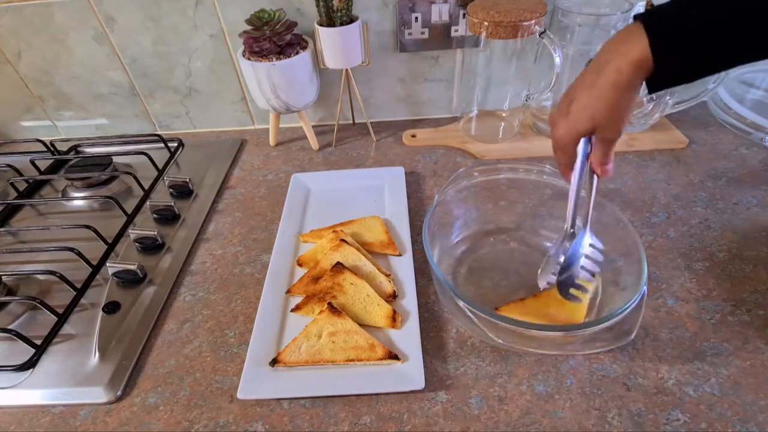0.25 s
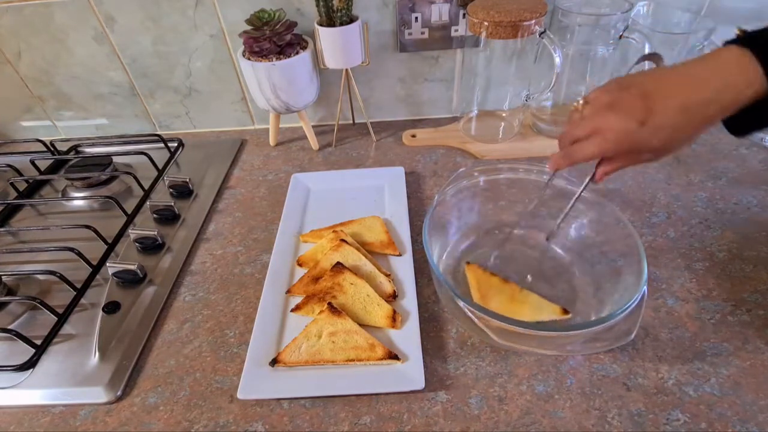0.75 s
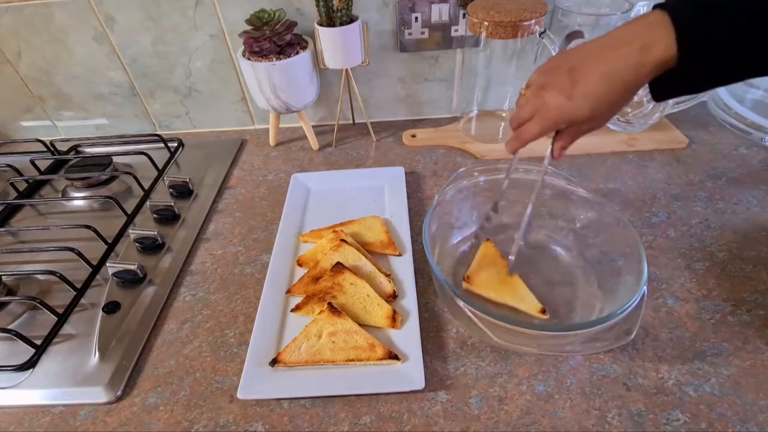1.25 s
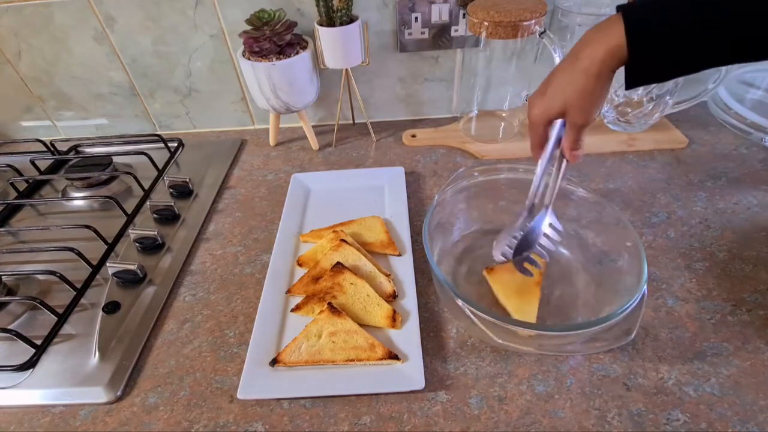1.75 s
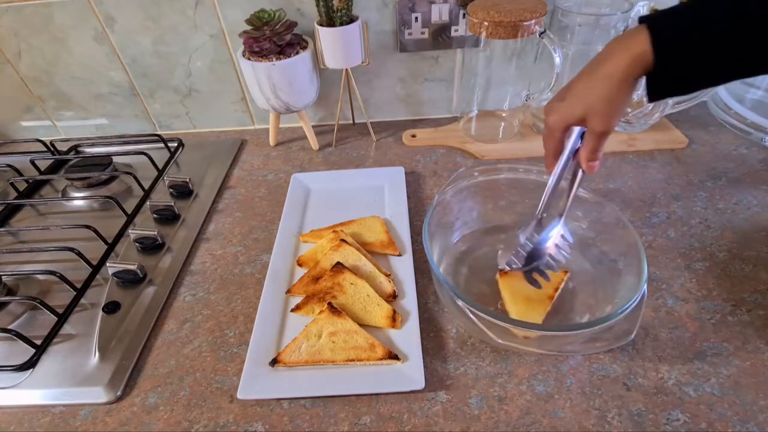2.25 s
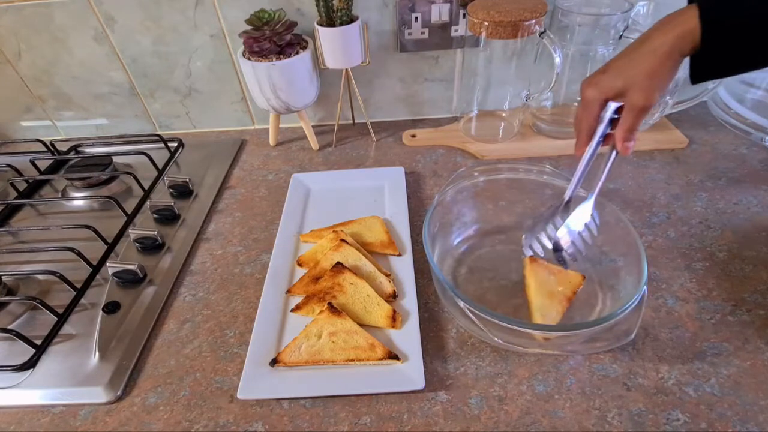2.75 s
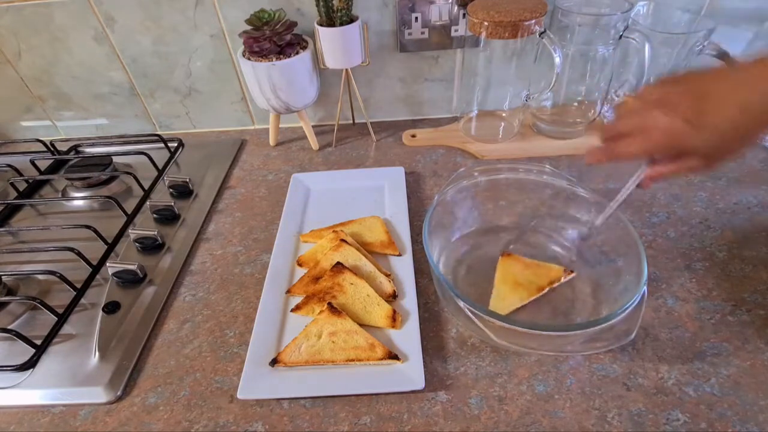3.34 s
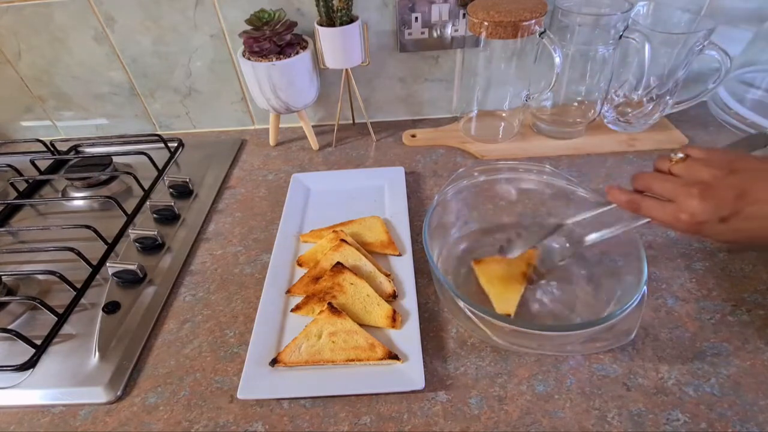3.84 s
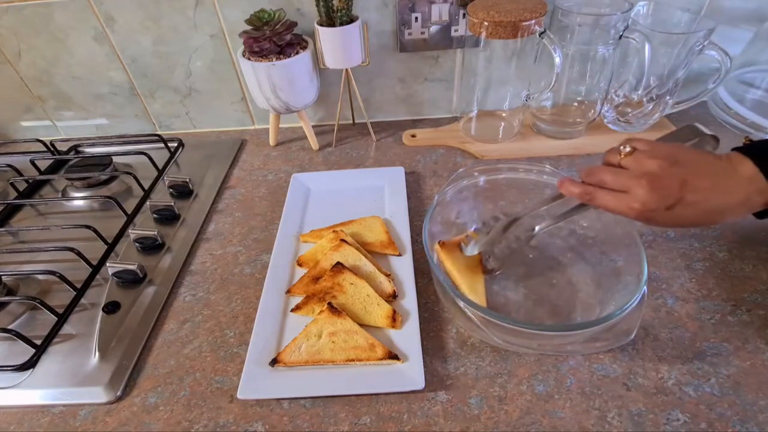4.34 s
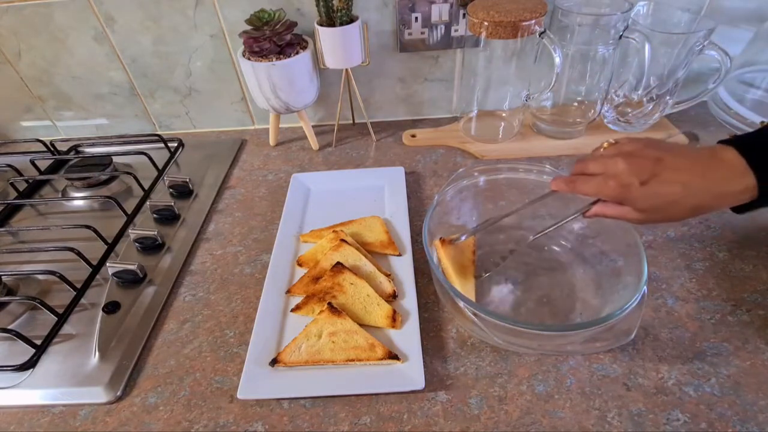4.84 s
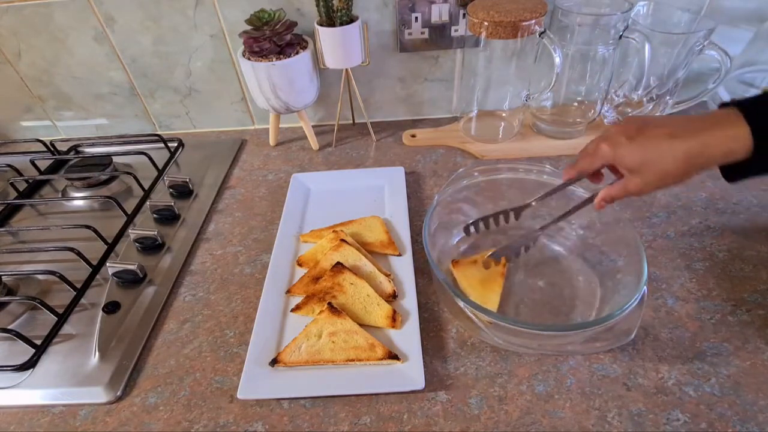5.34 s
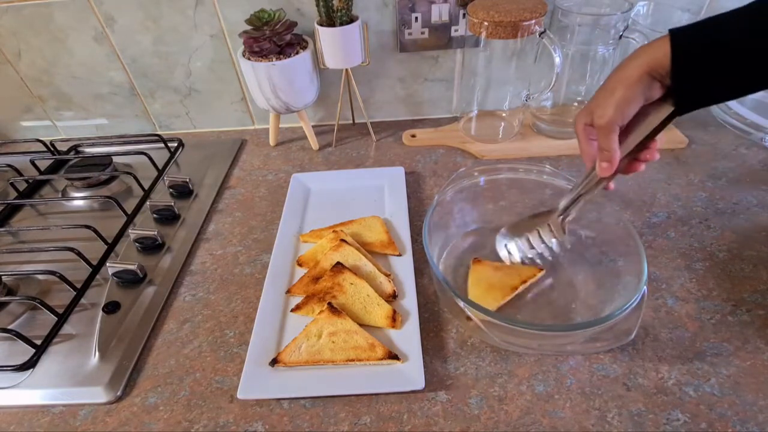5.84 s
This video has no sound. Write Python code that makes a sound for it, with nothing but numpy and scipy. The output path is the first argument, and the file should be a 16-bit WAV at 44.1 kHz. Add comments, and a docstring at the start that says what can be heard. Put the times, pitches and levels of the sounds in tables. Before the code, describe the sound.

A small tiled kitchen, heard close in stereo with the action slightly right; low rumble, thin hiss and a very faint steady high tone lie beneath. From 0 to 0.3 s, steel tong tips tap quickly and scrape in a glass bowl, with two tiny squeaks. Dull dry knocks of pastry crust follow at 0.4-0.6 s and around 1.1 s. From 1.5 to 2.5 s comes a busier run of light ticks, crusty crunches, short scrapes and soft base bumps. Barely audible ticks lead to a crisp crunch at 3.1 s. At 3.69 s a hard, bright crack on the glass is by far the loudest event, its ring fading with short room echoes. A crunchy knock comes at 3.9 s, then faint ticks and dull knocks around 4.5 s. A soft glass ping sounds at 5.14 s, the tong arms clack sharply at 5.62 s, and a light tap and small scrape finish near 5.8-6 s.

```python
"""Steel tongs and a toasted pastry in a glass bowl

A little to the right, tong tips tap and scrape in a bowl on a worktop: noise bursts and decaying modes.
They strike the glass once hard and also softly, squeak twice, and their arms clack together.
The pastry's crust knocks and crunches in short noise bursts. A small tiled kitchen answers with noise
echoes, over a low rumble, thin hiss and a faint high tone.
"""
import sys
import numpy as np
from scipy import signal
from scipy.fft import rfft, irfft
from scipy.io import wavfile
from scipy.ndimage import uniform_filter1d

SR = 44100
rng = np.random.default_rng(int(sys.argv[2]) if len(sys.argv) > 2 else 0)


def wav_record(signal):
    """Record a signal, one row per channel, as 16-bit PCM in the file named by sys.argv[1]."""
    frames = np.transpose(np.atleast_2d(signal))
    bounded = np.clip(frames, -1, 1)
    # unit amplitude maps onto the largest positive 16-bit level
    quanta = np.round(bounded * 32767).astype(np.int16)
    wavfile.write(sys.argv[1], SR, quanta)


N = 268128  # length of the scene [samples]
TIME = np.arange(N) / SR
AGE = TIME[:SR]  # time since a contact [s], up to one second
LEFT_RIGHT = np.array([[1], [-1]])  # opposite signs for the two channels

# Levels in the tables are relative: the functions add their own settings to them.
# A t60 is the time a sound takes to fall by 60 dB.


def amp(db):
    """Turn decibels into gain."""
    return 10 ** (np.asarray(db) / 20)


def unit(x):
    """Scale a signal to an rms of 1."""
    return x / np.sqrt(np.mean(x ** 2))


def fade(t60):
    """Die away exponentially after a contact, by 60 dB in t60 seconds."""
    return np.exp(-np.log(1000) * AGE / t60)


def on_bins(points, size):
    """Read a table of (frequency [Hz], value) at every FFT bin, along a logarithmic pitch scale."""
    hz, value = np.transpose(points)
    bin_hz = np.arange(size // 2 + 1) * SR / size
    return np.interp(np.log(bin_hz + 1), np.log(hz), value)


def noise(colour, likeness, size):
    """Make coloured stereo noise of rms 1; mixing mid and side sets how alike left and right are."""
    mid, side = rfft(rng.standard_normal((2, size)))
    likeness = np.clip(likeness, -1, 1)
    pair = mid * np.sqrt(1 + likeness) + LEFT_RIGHT * side * np.sqrt(1 - likeness)
    return unit(irfft(pair * amp(on_bins(colour, size)), size))


# How alike left and right hear a contact: (frequency [Hz], correlation [-1 to 1])
CONTACT_LIKENESS = [(150, 0.97), (600, 0.56), (1300, 0.077), (4000, 0.34), (12000, 0.59)]


def burst(colour, t60, rise_s=0.0013, patchy_db=6, spacing_hz=75):
    """Use fading noise for a crowd of short-lived modes; in the treble some stand out from the rest."""
    hz = np.arange(SR // 2 + 1)
    heights = rng.standard_normal(600).clip(-1.7, 1.7)
    ripple = np.interp(hz / spacing_hz, np.arange(600), heights)
    lift = amp(patchy_db * ripple * np.clip(hz / 5000, 0, 1) ** 2)
    lift = lift / np.sqrt(uniform_filter1d(lift ** 2, size=1500))  # keep the overall colour
    plain = noise(colour, on_bins(CONTACT_LIKENESS, SR), size=SR)
    crowd = irfft(rfft(plain) * lift, SR)
    return crowd * fade(t60) * np.clip(AGE / rise_s, 0, 1)


def ring(modes, detune=0, scatter_db=0, centre_hz=3000, octaves=99):
    """Add decaying sines, strongest near the pitch the contact excites; each side gets its own phase."""
    out = np.zeros((2, SR))
    for hz, db, t60 in modes:
        pitch, luck = rng.standard_normal(2)
        phase = .75 * np.sin(hz / 270) * min(hz / 400, 1) * LEFT_RIGHT
        angle = 2 * np.pi * hz * (1 + detune * pitch) * AGE + phase
        wave = np.sin(angle.astype(np.float32))
        reach = np.exp(-.5 * (np.log2(hz / centre_hz) / octaves) ** 2)
        out += amp(db + scatter_db * luck) * reach * fade(t60) * wave
    contact = np.clip(AGE / 0.0011, 0, 1)  # the push lasts about a millisecond
    total_power = sum(amp(db) ** 2 for _, db, _ in modes) / 2
    return contact * out / np.sqrt(total_power)


def add(track, s, sound):
    """Mix a sound into a track, starting at s seconds."""
    start = max(int(s * SR), 0)
    track[:, start:start + sound.shape[1]] += sound[:, :N - start]


def through(x, response):
    """Pass a sound through a stereo response scaled to unit energy."""
    return signal.fftconvolve(np.atleast_2d(x), unit(response) / np.sqrt(SR), axes=1)[:, :N]


# Modes of the bowl's base on the worktop: (frequency [Hz], level [dB], t60 [s])
BASE_MODES = [(74, -26, 0.32), (120, -15.5, 0.86), (240, -9.5, 0.14), (306, -5, 0.25), (344.7, 4, 0.09),
              (413.8, -7.5, 0.24), (486, -5, 0.22), (633, -13.5, 0.2), (700, -12.5, 0.095)]


def thud():
    """The bowl's base bumps the worktop and rings in a few low modes."""
    return ring(BASE_MODES, detune=.02)


# Light taps of the tong tips:
# (time [s], pitch of the tips [Hz], steel level [dB], base thud level [dB], tick level [dB])
TAPS = [(0.0173, 1727, -29, -31.5, -25.5), (0.0795, 1690, -40, -50, -37.5), (0.1385, 1830, -31.5, -43, -32),
        (0.195, 1790, -39, -69, -38.5), (0.2612, 1830, -38, -46.5, -33.5), (1.072, 1750, -55, -59, -41.5),
        (1.1295, 1750, -72, -54, -45), (1.58, 1830, -43, -48, -38), (1.68, 1710, -45, -40.5, -37),
        (1.7229, 1670, -38.5, -36, -41), (1.78, 1810, -39, -45, -33), (1.8235, 1820, -34, -52, -54),
        (1.8919, 2180, -36.5, -50, -38.5), (1.9814, 1960, -43.5, -50, -50), (2.149, 1900, -71, -72, -44.5),
        (2.297, 1770, -39.5, -49, -36), (2.3139, 1800, -43, -48, -38.5), (2.4208, 1900, -37.5, -47, -43.5),
        (4.0114, 1850, -54.5, -51.5, -36.5), (5.4365, 1850, -72, -68, -48.5),
        (5.7576, 1850, -41.5, -58, -35)]
# Other modes of the steel tongs, damped by the hand: (frequency [Hz], level [dB], t60 [s])
TONG_MODES = [(1766, 1, 0.11), (1847, 3.5, 0.14), (2096, -10.5, 0.12), (2898, -0.5, 0.075), (3140, 5, 0.11),
              (3183, -5, 0.037), (3950, -2, 0.061), (4420, -5, 0.1), (5790, -12.5, 0.36),
              (6550, -14, 0.081), (7100, -29, 0.13), (8000, 3, 0.12), (8400, -8.5, 0.31), (9420, -19, 0.09),
              (11000, -22, 0.07)]
# Colour of a bright tick: (frequency [Hz], level per Hz [dB])
TICK_COLOUR = [(40, -21), (700, -2), (1400, -2), (1850, -10), (2500, -8.5), (3100, 0.5), (3600, -10),
               (6000, -5), (8300, 0), (9200, -3.5), (11000, -1.5), (15500, -15.5)]


def taps(tip_db=-9, ring_db=-11, thud_db=-4, tick_db=-3):
    """Each tap ticks, rings the tongs and bumps the bowl; the grip shifts the pitches and their shares."""
    out = np.zeros((2, N))
    for s, tip_hz, steel, base, tick in TAPS:
        # the tips chatter as they land, which roughens their resonance into a narrow band of noise
        chatter = [(tip_hz * .7, -45), (tip_hz * .88, -14), (tip_hz, 0),
                   (tip_hz * 1.14, -14), (tip_hz * 1.4, -45)]
        add(out, s, amp(steel + tip_db) * burst(chatter, t60=0.096, rise_s=0.0023))
        add(out, s, amp(steel + ring_db) * ring(TONG_MODES, detune=0.0142, scatter_db=3.0))
        add(out, s, amp(base + thud_db) * thud())
        add(out, s, amp(tick + tick_db) * burst(TICK_COLOUR, t60=0.049, rise_s=0.0042, patchy_db=3.0))
    return out


# Blows on the bowl's wall: (time [s], ring level [dB], crack level [dB],
# pitch the contact excites most [Hz], its reach [octaves], extra damping by the resting tongs, t60 [s])
CLINKS = [(2.99, -48.5, -57, 2630, .06, 0.84), (3.6863, -19, -7.5, 3440, 3.5, 8.8),
          (3.6916, -24.5, -19, 3900, .12, 0.78), (3.704, -37.5, -13.5, 7010, 0.69, 1),
          (5.138, -34.5, -58.5, 2000, 0.34, 1.6)]
# Modes of the glass bowl, where close pairs beat: (frequency [Hz], level [dB], t60 [s])
BOWL_MODES = [(1321, -4.5, 1), (1334, 2, 0.43), (1630, -12, .55), (1655, -1, 0.87), (1790, -19.5, 0.83),
              (1720, -11.5, 0.45), (1885, -4.5, .25), (2600, -15.5, 0.59), (2625, -5, 0.6),
              (2785, -13.5, 0.34), (2850, -11, 0.32), (3020, -11, 0.25), (3270, -13.5, 0.4),
              (3850, -8, 0.77), (3970, -10, 0.69), (3960, -3, .48), (3940, 10, 0.17), (5180, -9, 0.22),
              (5280, -5, 0.503), (5570, -15, 0.51), (6405, -8, 0.38), (6600, -8.5, 0.42), (6950, -10, .3),
              (6950, -5, 0.4), (7530, -12, 0.37), (8120, -8, 0.49), (7900, -14.5, .33), (8200, -9, 0.24),
              (9798, -14.5, .27), (11090, -8.5, 0.56)]
# Colour of the crack: (frequency [Hz], level per Hz [dB])
CRACK_COLOUR = [(25, -39), (70, -12), (130, -30.5), (230, -29.5), (370, -6), (660, -9.5), (960, -24.5),
                (1700, -1.5), (2200, -16.5), (2900, 1), (3400, -10.5), (3930, -1.5), (4350, -14.5),
                (5400, -6.5), (10000, -14), (15500, -26)]


def clinks():
    """Steel hits the glass wall: return the hard crack and the longer ring of the bowl separately."""
    cracks, rings = np.zeros((2, 2, N))
    for s, ring_db, crack_db, centre_hz, octaves, held_t60 in CLINKS:
        glass = ring(BOWL_MODES, centre_hz=centre_hz, octaves=octaves) * fade(held_t60)
        add(rings, s, amp(ring_db) * glass)
        add(cracks, s, amp(crack_db) * burst(CRACK_COLOUR, t60=0.045, rise_s=0.002, patchy_db=7.5))
    return cracks, rings


# The arms of the tongs clack together: (time [s], level [dB])
CLACKS = [(5.6234, -24), (5.6278, -24)]
# Colour of the clack: (frequency [Hz], level per Hz [dB])
CLACK_COLOUR = [(30, -30), (100, -8), (200, -8), (320, 1), (730, -0.5), (900, -10), (1300, -2.5),
                (2300, -9.5), (3000, -0.5), (4200, -12.5), (5100, -3), (6250, -8.5), (7300, 1.5),
                (9600, -5), (15000, -17.5)]


def clacks(steel_db=-11, glass_db=-21, thud_db=-12):
    """The two arms meet in a bright clatter that also jolts the bowl."""
    out = np.zeros((2, N))
    for s, db in CLACKS:
        clatter = burst(CLACK_COLOUR, t60=0.11, patchy_db=5.5)
        steel = amp(steel_db) * ring(TONG_MODES, detune=0.0022, centre_hz=7200, octaves=0.23)
        glass = amp(glass_db) * ring(BOWL_MODES, centre_hz=1640, octaves=0.15)
        add(out, s, amp(db) * (clatter + steel + glass + amp(thud_db) * thud()))
    return out


# The pastry's crust knocks on the glass, and at 3.906 s a like burst plays as the bowl's ring swells where its
# close modes beat: (time [s], knock level [dB], crunch level [dB])
KNOCKS = [(0.378, -43, -60), (0.502, -41, -72), (0.527, -42.5, -55), (0.5935, -36, -43.5),
          (0.608, -59, -42.5), (1.076, -40, -43), (1.129, -39, -68), (1.529, -43, -55), (1.563, -36, -43.5),
          (1.681, -36.5, -51), (1.711, -34, -37), (3.105, -64, -40.5), (3.1172, -37.5, -34),
          (3.906, -34, -37), (4.5248, -38.5, -69), (4.58, -41, -58), (4.606, -39, -58), (5.011, -50.5, -56),
          (5.435, -43.5, -70)]
# Colour of the dull knock: (frequency [Hz], level per Hz [dB])
KNOCK_COLOUR = [(60, -20.5), (300, -12.5), (660, 2.5), (950, -12.5), (1330, 3.5), (1650, -11), (2300, -12),
                (4000, -30), (12000, -22.5)]
# Colour of the crunch: (frequency [Hz], level per Hz [dB])
CRUNCH_COLOUR = [(1500, -18), (2800, 1), (4300, -1.5), (6000, -2.5), (10500, -4.5), (15500, -15)]


def pastry(knock_db=-3.5, thud_db=-18, crunch_db=-3.5):
    """Dry crust gives way: a dull knock, which bumps the bowl in proportion, and a short crunch; the burst at
    3.906 s instead stands for the bowl's ring swelling."""
    out = np.zeros((2, N))
    for s, knock, crunch in KNOCKS:
        add(out, s, amp(knock + knock_db) * burst(KNOCK_COLOUR, t60=0.048, rise_s=0.003))
        add(out, s, amp(knock + thud_db) * thud())
        add(out, s, amp(crunch + crunch_db) * burst(CRUNCH_COLOUR, t60=0.072, rise_s=0.0042, patchy_db=2.5))
    return out


def stroke(start, length):
    """Pressure of one stroke: the tips bite, ease off as they slide, then lift."""
    bite_share, ease_db, release_s = 0.19, -12, 0.025  # bite_share: part of the stroke spent building up
    along = (TIME - start) / length
    bite = np.clip(along / bite_share, 0, 1) ** 2
    ease = amp(ease_db * np.clip(along, 0, 1))
    lift = np.clip(1 - (TIME - start - length) / release_s, 0, 1)
    return bite * ease * lift


# Strokes of the tips over the glass:
# (start [s], length [s], steel level [dB], base level [dB], hiss level [dB])
DRAGS = [(0.01, 0.19, -40, -46, -49), (0.259, 0.23, -56.5, -52.5, -56.5), (1.632, 0.076, -48, -54, -49),
         (1.668, 0.14, -48.5, -39.5, -34.5), (1.847, 0.13, -45.5, -53, -45),
         (1.973, 0.267, -58.5, -60, -58), (2.416, 0.088, -58, -70, -70), (4.633, 0.06, -50, -55, -51),
         (5.501, 0.2, -62, -50, -46.5), (5.949, 0.078, -51, -52, -40)]


def drags(steel_db=-8, base_db=-9, hiss_db=-7, slips_per_s=240, scatter_db=6):
    """Stick and slip: uneven tiny blows at random moments ring the tongs, shake the base and hiss."""
    sizes = amp(scatter_db * rng.standard_normal(N).clip(-1.5, 1.5)) * rng.choice([-1, 1], N)
    slips = unit((rng.random(N) < slips_per_s / SR) * sizes)
    pressed_steel = ring(TONG_MODES, detune=0.014) * fade(.08)  # pressing on the glass damps the steel
    base = thud() * fade(0.072)
    hiss = burst(TICK_COLOUR, t60=0.026, patchy_db=10)
    # one pressure curve each for steel, base and hiss
    forces = sum(np.outer(amp(levels), stroke(start, length)) for start, length, *levels in DRAGS)
    out = np.zeros((2, N))
    for db, force, response in zip([steel_db, base_db, hiss_db], forces, [pressed_steel, base, hiss]):
        out += amp(db) * through(slips * force, response)
    return out


# Steel squeaks on glass: (start [s], length [s], pitch [Hz], level [dB])
SQUEAKS = [(0.057, 0.069, 6500, -55), (0.196, 0.091, 5440, -64.5)]


def squeaks(wobble=0.0037, rough=.5):
    """The slipping locks on to one unsteady pitch: a sine whose pitch and loudness waver at random."""
    out = np.zeros((2, N))
    for s, length, hz, db in SQUEAKS:
        bend, grip = unit(uniform_filter1d(rng.standard_normal((2, SR)), size=150))
        swell = np.sin(np.pi * np.clip(AGE / length, 0, 1)) * (1 + rough * grip)
        angle = 2 * np.pi * np.cumsum(hz * (1 + wobble * bend)) / SR
        add(out, s, amp(db) * swell * np.sin(angle)[None])
    return out


# The tongs shift in the hand while they hold the pastry: (start [s], end [s])
HOLDS = [(2.72, 2.98), (4.17, 4.97)]


def fidgets(tick_db=-63, steel_db=-73, scatter_db=3, spacing_s=0.14):
    """Faint stray ticks of the held tongs, at uneven moments and of uneven loudness."""
    out = np.zeros((2, N))
    tick = amp(tick_db) * burst(TICK_COLOUR, t60=0.089)
    tick = tick + amp(steel_db) * ring(TONG_MODES, detune=0.012)
    for start, end in HOLDS:
        for s in np.arange(start, end, spacing_s):
            late, luck = rng.standard_normal(2)
            add(out, s + spacing_s * np.tanh(late) / 2, amp(scatter_db * luck) * tick)
    return out


# How alike left and right hear the room: (frequency [Hz], correlation [-1 to 1])
ROOM_LIKENESS = [(130, 1), (300, 1), (600, 1), (1200, -0.24), (3000, 0.75), (12000, 0.85)]


def kitchen(x, near_db=-5, tail_db=-4, low_t60=0.5, high_t60=0.42):
    """Worktop and tiles scatter the sound at once; the room follows, its treble dying sooner."""
    likeness = on_bins(ROOM_LIKENESS, SR)
    near_colour = [(100, 0.0031), (16000, 0.003)]  # practically flat
    low_colour = [(100, -0.5), (2000, -5.5), (6000, -12.0), (16000, -39)]
    high_colour = [(100, -26.0), (2000, -4.5), (6000, -4.5), (16000, 3.5)]
    near = noise(near_colour, likeness, size=SR) * fade(0.11) * (AGE > .002)
    low = noise(low_colour, likeness, size=SR) * fade(low_t60)
    high = noise(high_colour, likeness, size=SR) * fade(high_t60)
    tail = (low + amp(8.0) * high) * np.clip(AGE / 0.011, 0, 1) ** 2
    return amp(near_db) * through(x, near) + amp(tail_db) * through(x, tail)


# Colour of the still kitchen: (frequency [Hz], level per Hz [dB])
AIR_COLOUR = [(15, -45), (25, -18.5), (74, 0.5), (123, -11), (373, -8), (575, -14.5), (624, -13),
              (1610, -24.5), (2000, -27.5), (2280, -26.5), (3160, -33.5), (5280, -33.5), (5880, -35.5),
              (7710, -35.5), (16000, -32.5)]
# How alike left and right are in the still kitchen: (frequency [Hz], correlation [-1 to 1])
AIR_LIKENESS = [(100, .9), (250, 0.52), (600, 0.42), (4000, 0.83)]


def background(air_db=-60, whine_hz=2320, whine_db=-80.5, waver=.3):
    """Coloured noise gives low rumble and thin hiss; a sine gives a faint, slightly wavering high tone."""
    air = noise(AIR_COLOUR, on_bins(AIR_LIKENESS, N), size=N)
    drift = np.interp(TIME, np.linspace(0, TIME[-1], 30), rng.standard_normal(30))
    whine = unit(np.sin(2 * np.pi * whine_hz * TIME + drift) * (1 + waver * drift))
    return amp(air_db) * air + amp(whine_db) * whine


def scene(small_right_db=2.6, clink_right_db=1.9, ring_room_db=-15):
    """Put all contacts in the kitchen; the right side is louder than the left by the given levels."""
    cracks, rings = clinks()
    handling = taps() + clacks() + pastry() + drags() + squeaks() + fidgets()
    small = handling + kitchen(handling) + background()
    # the ring of the bowl feeds the room less than the crack does
    clink_room = kitchen(cracks + amp(ring_room_db) * rings, near_db=-10.5, tail_db=-1.5)
    glass = cracks + rings + clink_room
    sides = np.array([[-.5], [.5]])  # half the difference down on the left, half up on the right
    return small * amp(sides * small_right_db) + glass * amp(sides * clink_right_db)


def record(dry):
    """Round the highest peaks softly, then cut everything above the top frequency."""
    top_hz = 15850
    rounded = .9 * np.tanh(dry / .9)
    low_pass = signal.ellip(10, .2, 70, top_hz, fs=SR, output="sos")
    return signal.sosfilt(low_pass, rounded)


dry = scene()
out = record(dry)
wav_record(out)
```